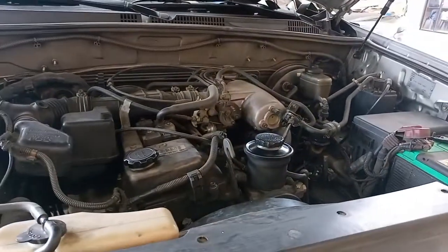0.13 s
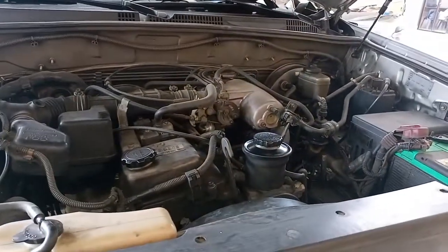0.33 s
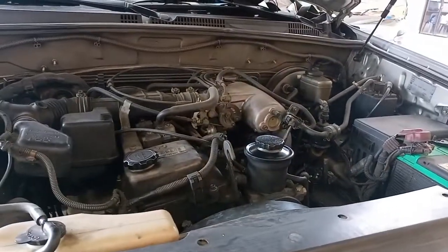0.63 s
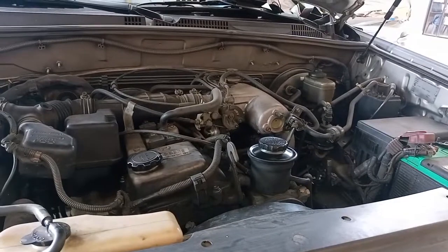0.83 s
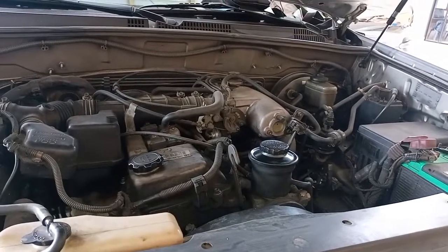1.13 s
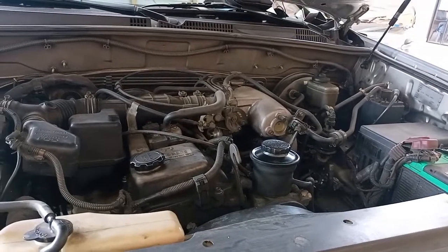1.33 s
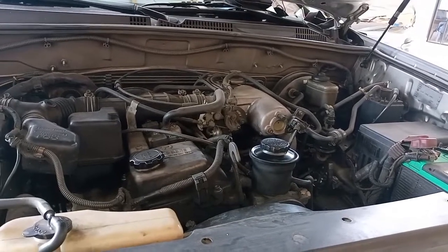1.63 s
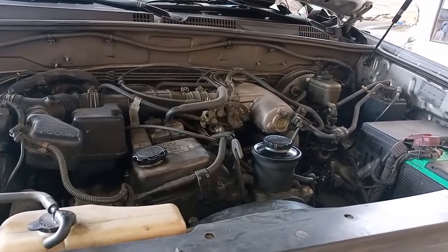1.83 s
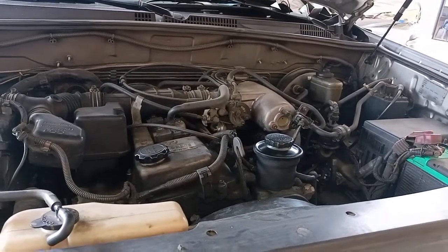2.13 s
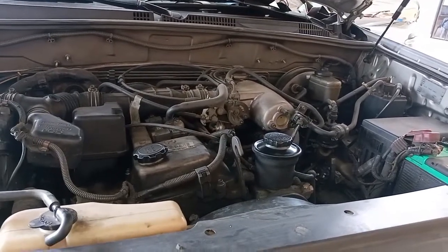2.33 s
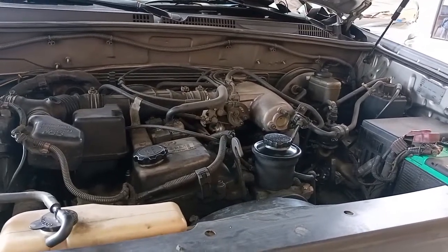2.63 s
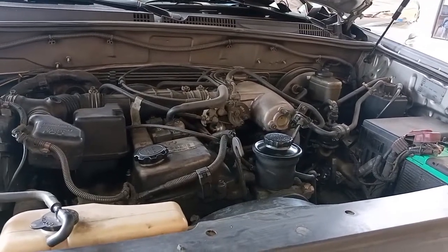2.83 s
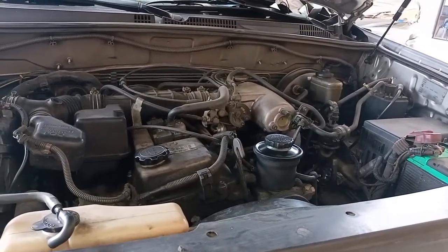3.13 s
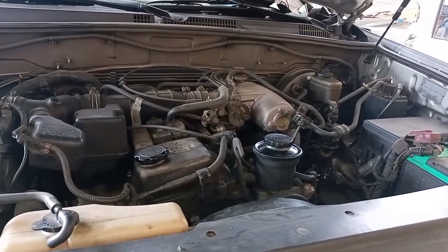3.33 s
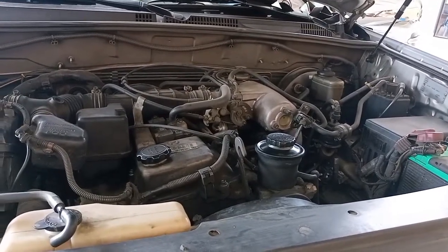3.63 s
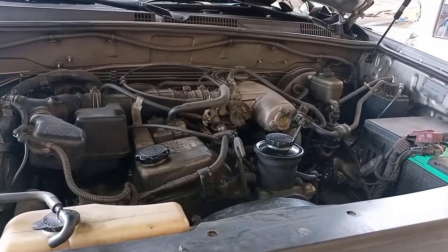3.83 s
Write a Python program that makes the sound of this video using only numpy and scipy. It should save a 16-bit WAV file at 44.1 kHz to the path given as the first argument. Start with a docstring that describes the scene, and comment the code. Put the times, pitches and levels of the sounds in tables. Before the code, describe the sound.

A four-cylinder car engine starts outdoors: over two seconds of quiet electric hum and buzz, a sharp starter clack, brief grinding whine in three bursts, then the engine catches and roars, close mono microphone over the open bay.

```python
"""A four-cylinder petrol engine is started outdoors, heard by one mono microphone over its open engine bay.
Each firing drives thump, boom, roar and clatter as the engine catches and flares up to a fast idle.
Before it the starter clacks in and grinds through three compressions: tooth noise plus gliding gear tones.
First, with the ignition on, wobbling tones hum and buzz like a servo, with a hiss and a faint whistle.
Coloured noise makes the air of the place, a low drone and a passing rush."""
import sys
import numpy as np
from scipy import signal
from scipy.fft import rfft, irfft
from scipy.io import wavfile
from scipy.ndimage import map_coordinates

SR = 44100
rng = np.random.default_rng(int(sys.argv[2]) if len(sys.argv) > 2 else 0)


def store_pcm(level_fs):
    """Save levels as 16-bit WAV."""
    pcm = np.round(np.clip(level_fs, -1, 1) * 32767).astype(np.int16)
    wavfile.write(sys.argv[1], SR, np.atleast_2d(pcm).T)


N = 176400
T = np.arange(N) / SR  # time of each sample, s

# resonances of the starter housing: centre_hz [Hz], width_hz [Hz], level_db [dB]
HOUSING_MODES = [(590, 40, 1), (1290, 200, 0), (1478, 80, -4), (2000, 140, -6), (2945, 170, -2),
                 (3250, 200, -6), (3780, 160, -7)]


def amp(db):
    """Decibels to a linear gain."""
    return 10 ** (np.asarray(db) / 20)


def unit(x):
    """Scale to rms 1."""
    return x / np.sqrt(np.mean(x ** 2) + 1e-20)


def curves(rows):
    """One value per sample for each column after the time."""
    s, *cols = np.transpose(rows)
    return [np.interp(T, s, c) for c in cols]


def wobble(rate):
    """A smooth random curve, rate knots a second."""
    knots = rng.standard_normal(int(N * rate / SR) + 4)
    return map_coordinates(knots, [T * rate])


def noise():
    """White noise."""
    return rng.standard_normal(N)


def turns(hz):
    """Cycles completed at a changing frequency."""
    return np.cumsum(hz) / SR


def tone(hz):
    """A sine of rms 1 at a changing frequency."""
    return np.sqrt(2) * np.sin(2 * np.pi * turns(hz))


def filtered(x, response):
    """x times a complex response of frequency."""
    spectrum = rfft(x, 2 * N)
    return irfft(spectrum * response(np.fft.rfftfreq(2 * N, 1 / SR)))[:N]


def coloured(x, points):
    """Causal filter through (Hz, dB) points; rms 1."""
    hz, db = np.transpose(points)

    def response(f):
        level_db = np.interp(np.log(f + 1), np.log(hz + 1), db)
        cepstrum = irfft(np.log(amp(level_db)))
        # folding the cepstrum forward in time gives minimum phase
        return np.exp(rfft(np.r_[cepstrum[0], 2 * cepstrum[1:N]], 2 * N))
    return unit(filtered(x, response))


def resonate(x, modes):
    """x through parallel (Hz, width Hz, dB) resonances; rms 1."""
    def response(f):
        return sum(amp(db) * 1j * f * w / (c * c - f * f + 1j * f * w) for c, w, db in modes)
    return unit(filtered(x, response))


def pulses(rate, scatter_db):
    """One impulse per cycle, uneven in size; rms 1."""
    at = np.flatnonzero(np.diff(np.floor(turns(rate))) > 0)
    x = np.zeros(N)
    x[at] = amp(scatter_db * rng.standard_normal(len(at)))
    return unit(x)


def gated(rate, depth_db):
    """Noise that falls by depth_db over each cycle (rises if negative), then jumps back; rms 1."""
    return unit(noise() * amp(-depth_db * (turns(rate) % 1)))


def bay(x):
    """Short dense reflections from bonnet and bulkhead, mixed equally with the direct sound."""
    t60_s = .08
    t = T[:SR // 4]
    tail = rng.standard_normal(len(t)) * amp(-60 * t / t60_s) * (t > .002)
    reflected = signal.fftconvolve(x, tail / np.linalg.norm(tail))[:N]
    return (x + reflected) / np.sqrt(2)


def engine():
    """Each firing thumps, booms in the exhaust, rattles the valve gear and pulses the fan and intake air."""
    # engine speed: time_s [s], firing_rate [firings a second]
    firing_speed = [(2.96, 26), (3.1, 33), (3.22, 41.5), (3.4, 50), (3.53, 54.5), (3.7, 62.8), (3.86, 64.6),
                    (4, 63)]
    # engine levels: time_s [s], exhaust_thump_db [dB], fan_intake_roar_db [dB], clatter_db [dB]
    engine_levels = [(2.78, -39, -72, -60), (2.94, -34, -63, -45), (2.975, -24, -53, -18.5),
                     (3.04, -24.5, -33, -18.5), (3.12, -26.5, -33, -21.5), (3.22, -25.5, -22.5, -20.5),
                     (3.29, -25, -23, -21.5), (3.42, -17.5, -18.5, -22.5), (3.52, -21.5, -15.5, -24.5),
                     (3.61, -16.5, -13.5, -24.5), (3.87, -20.5, -13.5, -28.5), (4, -30, -14.5, -28.5)]
    # exhaust tone levels: time_s [s], boom_db [dB], overtones_db [dB]
    boom_levels = [(3.18, -70, -57), (3.25, -21, -35), (3.4, -16.5, -34), (3.53, -27, -27.5),
                   (3.7, -19, -26.5), (3.87, -21, -22.5), (4, -23.5, -26.5)]
    # boom overtones: order [multiple of the firing rate], relative_db [dB]
    firing_orders = [(4, -8), (5, -8), (6, 0), (9, -7), (18, -12)]
    # spectra of the three noises: frequency_hz [Hz], level_db [dB]
    thump_colour = [(20, -68), (45, -38), (75, -15.5), (115, 1.5), (200, -0.5), (320, -2.5), (450, -5),
                    (800, -19), (5000, -98)]
    roar_colour = [(20, -55), (45, -28), (110, -9), (280, 0), (420, -5.5), (520, -7), (750, -7), (950, -7),
                   (1150, -9), (1960, -14), (2200, -16.5), (3500, -22), (4600, -26.5), (5750, -43),
                   (8700, -34), (12400, -72), (15500, -70)]
    clatter_colour = [(40, -60), (120, -29), (260, -1.5), (480, -22), (585, -4), (750, -7.5), (1950, -3.5),
                      (2380, -8), (3000, -5.5), (4200, -11.5), (5700, -24), (8820, -18.5), (12500, -34),
                      (15500, -25)]

    rate = curves(firing_speed)[0] * (1 + .006 * wobble(30))
    thump_db, roar_db, clatter_db = curves(engine_levels)
    boom_db, overtones_db = curves(boom_levels)

    thump = coloured(.5 * pulses(rate, scatter_db=3) + gated(rate, depth_db=1), thump_colour)
    boom = amp(boom_db + 1.4 * wobble(22.37)) * tone(3 * rate)
    overtones = sum(amp(overtones_db + db + 1.9 * wobble(22.12)) * tone(k * rate + 2 * wobble(40))
                    for k, db in firing_orders)

    puffs = bay(pulses(rate, scatter_db=2.5))
    roar = coloured(gated(rate, depth_db=-1) + .5 * puffs, roar_colour)
    roar = roar * amp(0.74 * wobble(60))

    tick_rate = 4 * rate * (1 + 0.18 * wobble(150))
    ticks = bay(pulses(tick_rate, scatter_db=2.5))
    clatter = coloured(gated(rate, depth_db=2.0) + 0.4 * ticks, clatter_colour)
    clatter = clatter * amp(0.91 * wobble(70))

    turning = np.clip((T - engine_levels[0][0]) / 0.02, 0, 1)
    noises = amp(thump_db) * thump + amp(roar_db) * roar + amp(clatter_db) * clatter
    return turning * (noises + boom + overtones)


def starter():
    """Teeth grind and gears whine under each compression; between them the motor spins free.

    The housing groans and sings briefly where a gear tone glides through one of its resonances."""
    # starter gear whine: time_s [s], pitch_hz [Hz]
    whine_glide = [(2.34, 900), (2.4, 2000), (2.475, 2960), (2.555, 4250), (2.61, 4130), (2.66, 3690),
                   (2.69, 3900), (2.755, 4680), (2.795, 4350), (2.885, 4950), (2.92, 4650), (2.98, 5050),
                   (3.23, 5100), (3.36, 3850)]
    # load of each compression: start_s [s], rise_s [s], end_s [s], level_db [dB], clean_mesh_share [0-1]
    compressions = [(2.556, 0.075, 2.66, -16, .42), (2.753, 0.003, 2.787, -12, .2),
                    (2.882, 0.005, 2.913, -12.7, .25)]
    # spectrum of the grinding teeth: frequency_hz [Hz], level_db [dB]
    grind_colour = [(60, -50), (130, -19), (330, -8.5), (600, 0.5), (1050, 1.5), (1700, -5), (3000, -1.5),
                    (3900, -10), (4800, -14), (5700, -24.5), (8660, -14.5), (12500, -38), (15500, -30)]
    # higher gear whines: multiple [of the whine pitch], level_db [dB]
    whine_overtones = [(2, -20), (2.48, -22)]
    # harmonics of the tooth mesh: number [multiple of the tooth rate]
    mesh_harmonics = [1, 2, 3, 4, 5, 6]
    engage_s, let_go_s, coast_s = 2.345, 3.23, 0.059
    spin_up_db, spin_up_s = 4, 0.16  # extra strain while the motor gathers speed
    first_bite, release_s = .45, .015  # share of the load at first contact; decay after its end
    sing_hz, sing_width_hz, groan_width_hz = 2960, 110, 25

    whine_hz = curves(whine_glide)[0]
    tooth_hz = whine_hz / 12.2
    uneven_hz = tooth_hz * (1 + .04 * wobble(300))
    coasting = np.exp(-np.maximum(T - let_go_s, 0) / coast_s)
    running = np.clip((T - engage_s) / 0.048, 0, 1) * coasting
    strain = amp(spin_up_db * (T < engage_s + spin_up_s))

    teeth = gated(uneven_hz, depth_db=7)
    rasp = coloured(teeth, grind_colour)
    mesh = sum(amp(3 * wobble(60)) * tone(k * uneven_hz + 20 * wobble(150)) for k in mesh_harmonics)
    mesh = coloured(mesh, grind_colour)

    def whine(multiple):
        """A gear tone broken into strands by fast wobble of level and pitch."""
        blur_hz = 88 * np.sqrt(multiple) * wobble(900)
        return amp(4 * wobble(110)) * tone(multiple * whine_hz + blur_hz)

    gear = amp(-3) * whine(1) * np.minimum(1, (3950 / whine_hz) ** 12)  # weakens above 3950 Hz
    for multiple, db in whine_overtones:
        gear = gear + amp(db) * whine(multiple) / (1 + (multiple * whine_hz / 9800) ** 16)

    groan_offset = (2 * tooth_hz - HOUSING_MODES[0][0]) / groan_width_hz
    groan = amp(-6) * tone(2 * uneven_hz) / (1 + groan_offset ** 2)

    loaded = np.zeros(N)
    for start, rise, end, db, share in compressions:
        bite = (T >= start) * np.clip(first_bite + (T - start) / (2 * rise), 0, 1)
        load = amp(db) * bite * np.exp(-np.maximum(T - end, 0) / release_s)
        grind = unit(share * mesh + (1 - share) * rasp)
        loaded += bay(load * grind) + load * (gear + groan)

    free = strain * amp(-29) * (housing(teeth) + amp(-2.5) * rasp)
    sing = amp(-21) * whine(0.98) / (1 + ((whine_hz - sing_hz) / sing_width_hz) ** 2)
    sing = sing * (T < compressions[0][0])  # only before the first compression
    brushes = amp(-42) * bay(whine(1.8)) * np.minimum(1, (whine_hz / 4400) ** 4)
    return loaded + running * (free + sing + brushes)


def solenoid():
    """The pinion slams into the ring gear with a crack, bounces and rings the housing."""
    # solenoid and pinion hit home: time_s [s], relative_db [dB]
    impacts = [(2.33, -27.5), (2.343, -14), (2.349, -9.5), (2.36, -17.5), (2.378, -22.5)]
    # spectrum of the clack: frequency_hz [Hz], level_db [dB]
    clack_colour = [(88, -63), (150, -31), (695, -20), (860, -8), (966, -14), (1290, -0.5), (1980, -16.5),
                    (3100, -8), (6470, -39.5), (9000, -24), (15500, -69)]
    clack_t60_s, ring_t60_s, crack_t60_s = 0.092, 0.58, .08

    def envelope(t60):
        return sum(amp(db - 60 * np.abs(T - s) / t60) * (T >= s) for s, db in impacts)

    clack = amp(1.0) * envelope(clack_t60_s) * coloured(noise(), clack_colour)
    ring = amp(-22) * envelope(ring_t60_s) * housing(noise())
    age = T - impacts[1][0]  # the crack comes with the second impact
    crack = amp(-25 - 60 * np.abs(age) / crack_t60_s) * (age >= 0) * noise()
    return clack + ring + crack


def housing(x):
    """The starter's casing rings at its resonances and rolls off above 4600 Hz; rms 1."""
    ringing = resonate(x, HOUSING_MODES)
    return unit(filtered(ringing, lambda hz: 1 / (1 + (hz / 4600) ** 10)))


def ignition_on():
    """A two-tone hum, the throttle servo's fuzzy odd-harmonic buzz, a priming hiss and a faint whistle."""
    # level of the hum: time_s [s], level_db [dB]
    hum_level = [(0, -42.5), (.07, -41.5), (.13, -54), (.28, -50), (.8, -47.5), (1.14, -48.5),
                 (1.22, -44.5), (1.55, -42.5), (1.72, -44.5), (1.88, -51.5), (2.0, -42), (2.15, -45.5),
                 (2.3, -48.5)]
    # servo buzz before it swells with the hiss: harmonic [multiple], level_db [dB]
    buzz_harmonics = [(3, -59), (5, -60), (7, -59.5), (9, -62.5), (11, -66.5), (17, -60)]
    # level of the priming hiss: time_s [s], level_db [dB]
    hiss_level = [(1.72, -63.5), (1.78, -51), (1.88, -56), (1.98, -40.5), (2.1, -41), (2.22, -45.5),
                  (2.34, -41.5)]
    # spectrum of the hiss: frequency_hz [Hz], level_db [dB]
    hiss_colour = [(88, -12), (150, -8), (736, -19), (2600, -21.5), (6230, -30.5), (8660, -15),
                   (15500, -42)]
    # faint whistle: time_s [s], pitch_hz [Hz], level_db [dB]
    whistle_glide = [(.83, 4040, -66), (.9, 4080, -55), (1.0, 4040, -61), (1.1, 3880, -55),
                     (1.3, 3800, -63), (1.48, 3740, -63)]

    hum_hz = 487 + 1.65 * wobble(11.5)
    hum = amp(curves(hum_level)[0]) * tone(hum_hz)
    hum = hum + amp(-61.5 + 0.84 * wobble(7.6)) * tone(2 * hum_hz)

    servo_hz = 516.6 + 2.8 * wobble(18)
    buzz = np.zeros(N)
    for k, db in buzz_harmonics:
        fuzz_hz = 28 * np.sqrt(k) * wobble(600)
        buzz += amp(db + 3.64 * wobble(110)) * tone(k * servo_hz + fuzz_hz)

    hiss_gain = amp(curves(hiss_level)[0])
    buzz = buzz * (1 + 2.18 * hiss_gain / hiss_gain.max())  # louder while the hiss is loud
    hiss = hiss_gain * coloured(noise(), hiss_colour)

    whistle_hz, whistle_db = curves(whistle_glide)
    whistle = amp(whistle_db) * tone(whistle_hz + 70 * wobble(570))
    return hum + buzz + hiss + whistle


def outdoors():
    """Background air, a distant low drone of slowly changing level and a soft low rush that comes and goes."""
    # spectrum of the air: frequency_hz [Hz], level_db [dB]
    air_colour = [(25, -34), (55, -26), (90, 10), (200, -3), (300, -2), (520, -4), (800, -13), (1600, -10),
                  (2600, -15), (3100, -19.5), (3700, -22.5), (4700, -22), (6200, -24.5), (7200, -23.5),
                  (8800, -12.5), (11000, -25), (13900, -39), (15500, -18.5)]
    # resonances of the distant drone: centre_hz [Hz], width_hz [Hz], level_db [dB]
    drone_modes = [(91, 12, -2), (143, 10, 2)]
    # level of the low drone: time_s [s], level_db [dB]
    drone_level = [(0, -45), (1.6, -47.5), (2.28, -42.5), (2.9, -52)]
    rush_at_s, rush_spread_s = 0.24, 0.28

    air = amp(-45 + 0.18 * wobble(2.9)) * coloured(noise(), air_colour)
    drone = resonate(resonate(noise(), drone_modes), [(114.5, 25, 0)])
    drone = amp(curves(drone_level)[0] + 1.7 * wobble(5.2)) * drone
    swell = np.exp(-((T - rush_at_s) / rush_spread_s) ** 2)
    rush = amp(-48.5) * swell * resonate(noise(), [(290, 51, 0)])
    return air + drone + rush


def scene():
    """Everything heard over the engine bay, in mono."""
    return (engine() + starter() + solenoid() + ignition_on() + outdoors())[None]


def record(dry):
    """The recorder rounds off peaks and keeps nothing above its band limit."""
    ceiling, top_hz = .95, 15800  # ceiling as a share of full scale
    x = dry[0] / (1 + np.abs(dry[0] / ceiling) ** 6) ** (1 / 6)
    return filtered(x, lambda hz: hz < top_hz)[None]


dry = scene()
out = record(dry)
store_pcm(out)
```